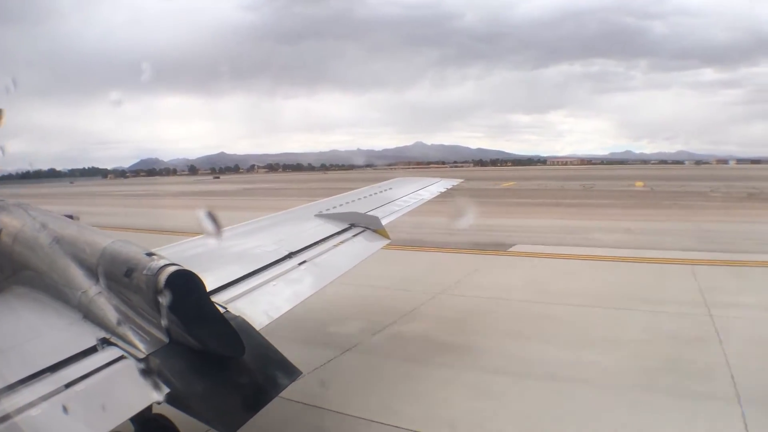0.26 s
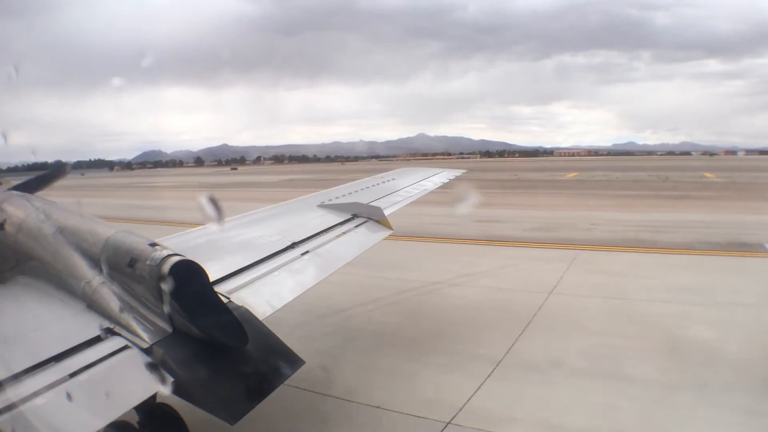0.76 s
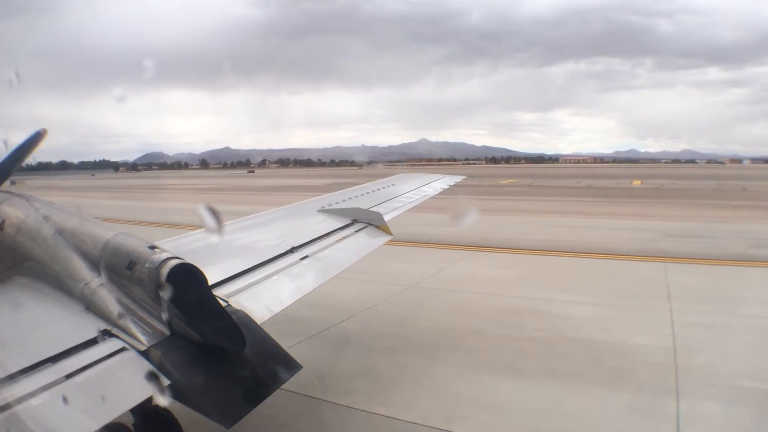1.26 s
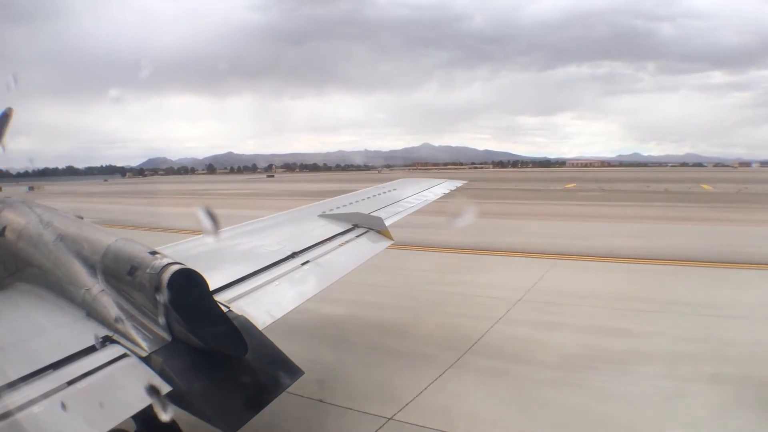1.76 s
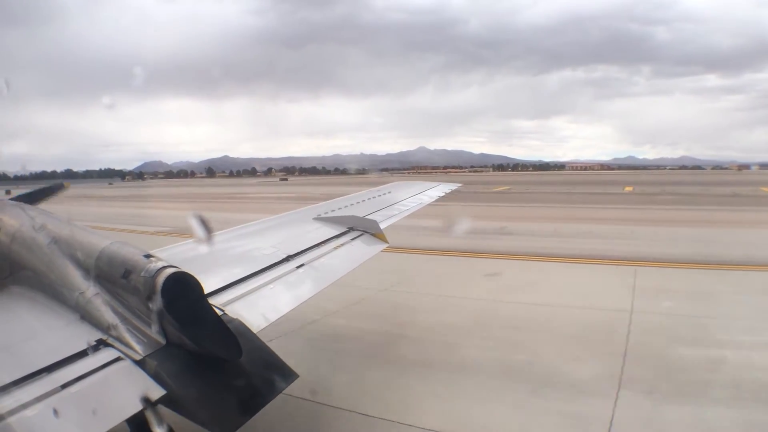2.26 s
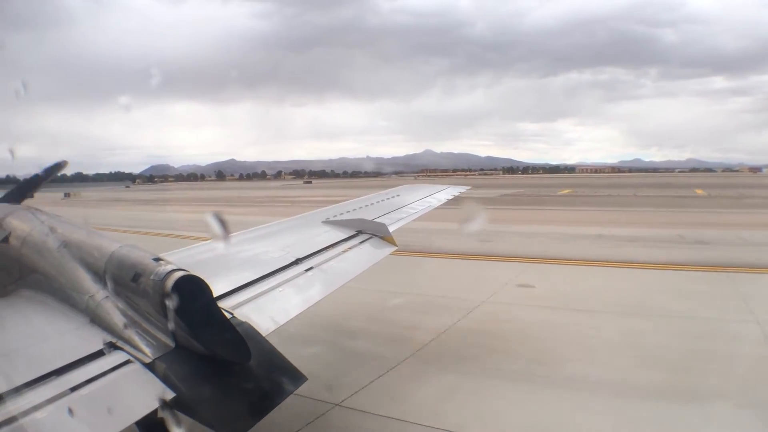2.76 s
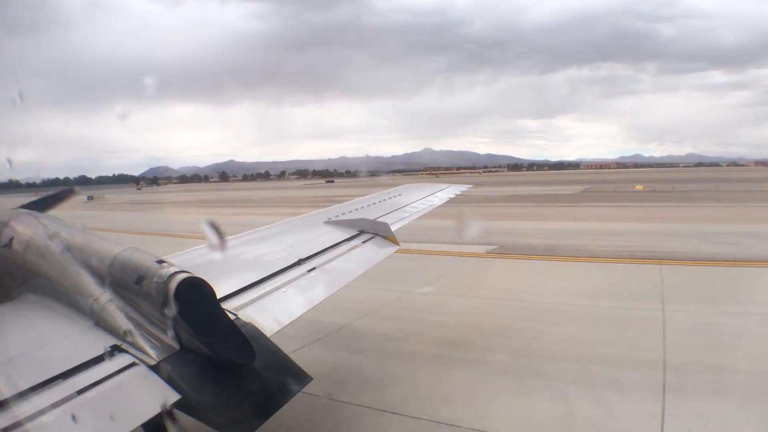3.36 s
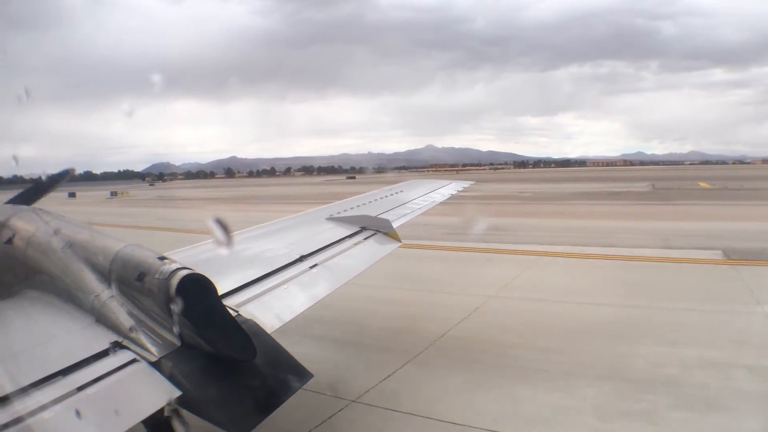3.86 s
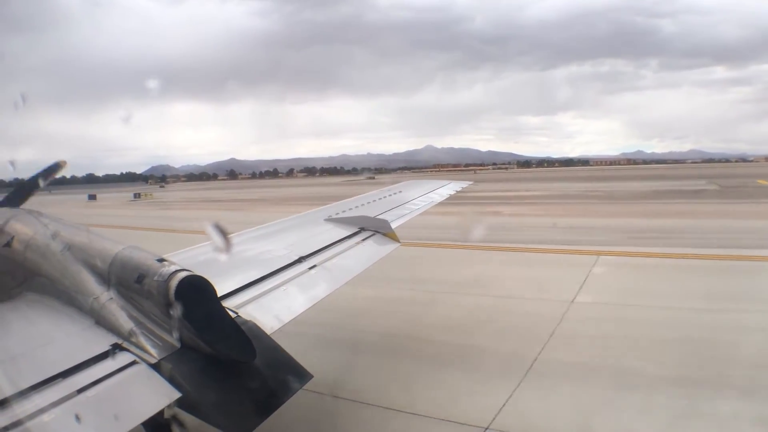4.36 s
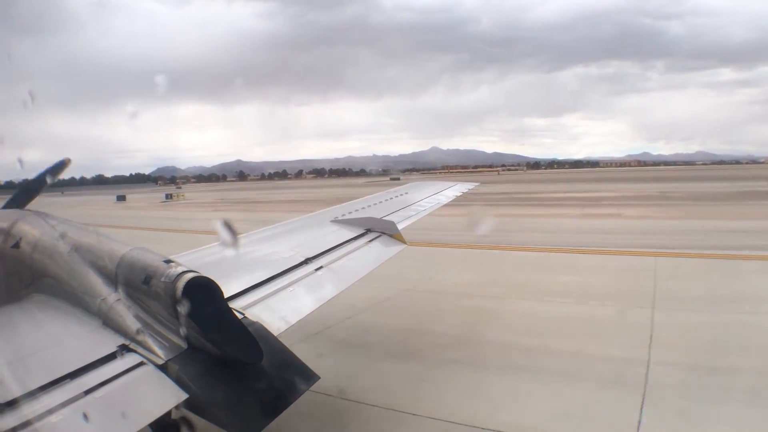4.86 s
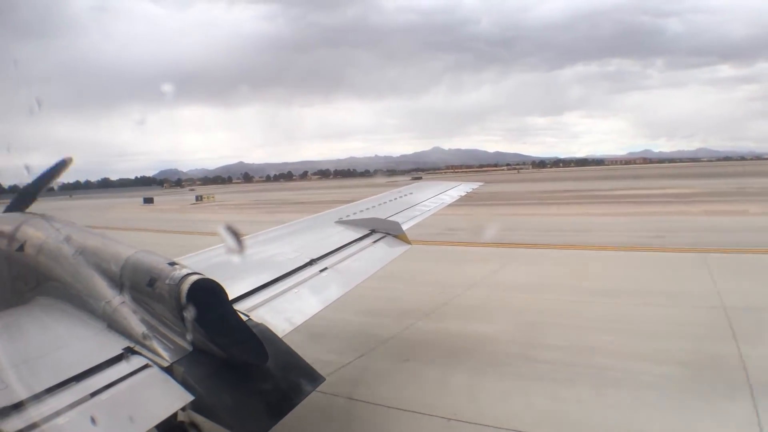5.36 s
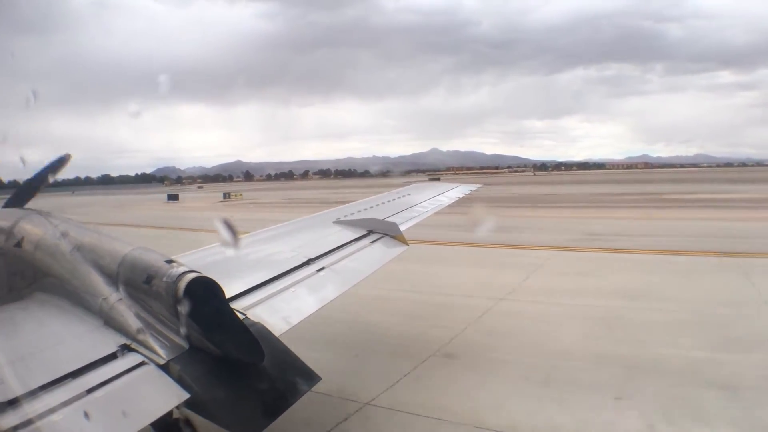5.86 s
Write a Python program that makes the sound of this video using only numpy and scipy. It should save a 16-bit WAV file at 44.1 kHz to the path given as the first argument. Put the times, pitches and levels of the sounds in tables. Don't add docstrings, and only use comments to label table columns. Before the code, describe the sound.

Inside a small propeller plane rolling over a slab runway, engines roar and whine steadily while wheels thump heavily and trim rattles and ticks.

```python
import sys
import numpy as np
from scipy import signal
from scipy.fft import rfft, irfft, next_fast_len
from scipy.io import wavfile

SR = 44100
rng = np.random.default_rng(int(sys.argv[2]) if len(sys.argv) > 2 else 0)


def output_pcm(signal):
    pcm = np.clip(np.atleast_2d(signal).T, -1, 1) * 32767
    wavfile.write(sys.argv[1], SR, np.round(pcm).astype(np.int16))


def convert_level_to_amplitude(level_db):
    exponent = np.asarray(level_db, float) / 20
    return 10 ** exponent


N = 269451

# (frequency [Hz], level [dB per Hz])
VENT_COLOUR = [(4000, -32), (6500, 1), (8400, -2), (8900, 2.5), (10500, 1), (13000, -1.5), (15300, -4),
               (17000, -14.5)]
# (frequency [Hz], level [dB per Hz])
ROAR_COLOUR = [(120, -45.5), (200, -3.5), (243, -9), (414, -12.5), (543, -15.5), (801, -20), (1050, -21),
               (1700, -24.5), (2100, -29), (3200, -31.5), (3800, -37), (5000, -41), (6300, -49),
               (8000, -61), (12000, -87.5)]
# (frequency [Hz], level [dB per Hz])
RUMBLE_COLOUR = [(10, -32), (22, -21.5), (36, -12.5), (47, -6.5), (70, -14), (90, -19), (108, -7.5),
                 (162, -1), (260, -21.5), (340, -48.5), (570, -120)]
# (frequency [Hz], width [Hz], lift [dB])
HULL_RESONANCES = [(67, 3.8, -2), (83, 4.9, -7), (134.9, 18, 7), (171, 21, 3), (317, 110, 6.5),
                   (707, 110, 3.5), (830, 39, -7), (917.5, 61, 7), (1074, 20, -2), (1343, 86, 3),
                   (1570, 16, 2), (1983, 41, 5.5), (2286, 50, 6), (2510, 52, 3.5), (3060, 340, 2.5),
                   (3567, 48, 2.5)]

# (time [s], level [dB])
ROAR_LEVEL = [(0, -31.5), (.87, -31), (1.6, -31.5), (2.64, -30.5), (3.2, -32), (4.4, -31.5), (5.05, -34),
              (5.46, -31.5), (6.11, -31.5)]
WHINE_HZ = [67, 83, 195.7, 448.2, 968.5, 1148, 1422.5, 1661.7, 1687.7, 1721.2, 2738.4, 3483]
# (rms level [dB], pitch wander [Hz], level wander [dB])
WHINE_LEVELS = [(-31.5, 1.94, 4), (-34, 1.95, 4), (-39, 0.4, 0.5), (-47, 1.6, 4), (-53, 1.48, 3),
                (-76.5, 0.62, 11), (-56.5, 0.51, 4), (-64, 0.35, 2), (-59, 0.33, 4.5), (-54.5, 0.55, 2),
                (-65, 1.5, 4), (-70, 3.4, 3)]
# (pitch creep [Hz/s], level creep [dB/s])
WHINE_CREEP = [(-0.0089, 1), (0, -1), (0, 0.5), (1.303, -0.9), (0.013, 0), (0.63, 0.5), (-0.118, 0),
               (-.15, -2.5), (-0.19, 0), (-.22, -0.55), (-0.13, -1), (-1, 2)]

# (time [s], peak level [dB])
TRIM_TICKS = [(0.1062, -54), (0.1782, -54.5), (0.2178, -55), (0.2652, -52), (0.3594, -50), (0.4811, -51.5),
              (0.5261, -49), (0.5891, -53), (0.636, -51), (0.7872, -52.5), (0.8584, -52), (0.8832, -48),
              (0.9154, -49), (1.0134, -50.5), (1.1096, -50), (1.1891, -49), (1.2573, -51), (1.3588, -53.5),
              (1.5541, -52.5), (1.9146, -51.5), (1.994, -52), (2.1651, -48), (2.3412, -52), (2.4125, -50.5),
              (2.5816, -54), (2.6293, -53), (2.7864, -53.5), (2.8569, -53.5), (3.0729, -49),
              (3.1445, -51.5), (3.3169, -45), (3.3306, -50), (3.3785, -52.5), (3.4735, -51.5),
              (3.5586, -54), (3.84, -52.5), (3.8898, -53), (3.9647, -50.5), (4.0073, -50.5),
              (4.0364, -53.5), (4.1118, -52.5), (4.1738, -54), (4.2056, -53.5), (4.5541, -52), (4.842, -52),
              (4.9339, -55), (5.0974, -52), (5.1437, -54.5), (5.3337, -54.5), (5.4534, -51), (5.481, -53),
              (5.5574, -50), (5.7154, -53.5), (6.0226, -50.5), (6.0431, -52)]
# (time [s], puff peak level [dB], ping level [dB], ping frequency [Hz])
TRIM_RATTLES = [(.357, -55, -78, 14810), (.478, -50, -66, 12170), (.521, -45, -56, 5000),
                (.582, -55, -68, 14200), (0.637, -54, -71, 12290), (0.771, -54, -70, 9600),
                (.783, -58, -65, 12000), (.883, -49, -66, 14300), (.908, -49, -65, 7120),
                (1.012, -58, -65, 8480), (1.039, -63.5, -64, 12170), (1.107, -51.5, -68, 7420),
                (1.188, -53, -62, 7010), (1.284, -60, -71, 14030), (1.552, -57.5, -72, 9460),
                (1.698, -58.5, -72, 11500), (1.904, -54.5, -63, 14130), (1.995, -56.5, -72, 14500),
                (2.164, -52, -63, 14800), (2.336, -55.5, -65, 7750), (2.407, -47, -64, 7190),
                (2.577, -58.5, -72, 7000), (2.605, -60, -69, 14600), (2.625, -54.5, -68, 10200),
                (2.642, -61, -67, 11000), (2.72, -64.5, -66, 11620), (2.859, -59, -69, 11600),
                (2.872, -59, -68, 10110), (3.069, -46.5, -49, 3300), (3.141, -56, -66, 10110),
                (3.312, -46.5, -58, 9420), (3.316, -54, -52, 4360), (3.316, -58, -66, 7600),
                (3.329, -55, -65, 7700), (3.322, -49, -68, 11480), (3.463, -57.5, -69, 11500),
                (3.836, -56.5, -66, 10340), (3.962, -55, -64, 11750), (4.005, -56, -74, 8430),
                (4.05, -49.5, -69, 8400), (5.097, -55, -67, 8600), (5.251, -53.5, -65, 9630),
                (5.328, -62.5, -72, 11800), (5.37, -57, -70, 11100), (5.478, -59, -73, 7200),
                (5.543, -55, -71, 10600), (5.566, -59, -73, 11300), (5.641, -54.5, -74, 9080),
                (5.715, -60, -72, 11400), (5.949, -62, -74, 11360), (6.039, -63, -72, 7530)]
NEIGHBOUR_HZ = [7200, 8400, 9600, 10100, 11600, 4900]
# (time [s], peak level [dB], frequency [Hz], time to fall 60 dB [s])
PANEL_KNOCKS = [
    (.754, -23, 744, .05),
    (.84, -26, 1290, .05),
    (1.146, -32, 2300, .05),
    (2.965, -25, 1850, .06),
    (2.969, -28, 1010, .05),
    (2.972, -22, 684, 0.059),
    (3.851, -23, 566, .02),
    (5.9452, -14, 750, 0.14),
    (6.0218, -17.5, 749, 0.065),
    (6.0745, -10, 718, 0.091),
]
# (time [s], peak level [dB], time to fall 60 dB [s])
PANEL_CREAKS = [(.212, -33, .06), (.274, -32, .06), (.385, -32, .07), (.646, -34, .07), (.748, -27, .07),
                (.811, -30, .06), (.836, -32, .06), (.858, -32, .06), (.889, -31, .06), (.918, -32, .06),
                (1.01, -33, .06), (1.145, -32, .05), (1.165, -32, .06), (1.39, -32, .07), (1.61, -32, .06),
                (1.71, -33, .07), (1.98, -32, .06), (2.438, -33, .07), (2.576, -32, .06), (2.645, -31, .06),
                (2.845, -32, .06), (2.96, -24.5, .085), (3.083, -33, .09), (3.327, -34, .08),
                (3.358, -31, .06), (3.622, -33, .06), (4.036, -31, .06), (4.238, -31, .06)]
CREAK_BAND_HZ = [600, 3200]

# (time [s], rms level [dB])
BLADE_LOAD = [(0, -59), (2.3, -37.5), (3.4, -27.5), (4, -31), (4.5, -27.5), (5.3, -29), (5.8, -28.5),
              (6.11, -27.5)]
OVERTONE_DB = [-1, -4, -11.5]
# (frequency [Hz], width [Hz], lift [dB])
WALL_PANELS = [(83.2, 2.74, 13), (77, 2.8, 5), (78.7, 4.7, 5), (86.0, 1.3, 7.5), (125.4, 13, 8.5),
               (136, 11, 4.5)]
# (time [s], gain [dB])
CRACK_SWELLS = [(4.31, -6), (4.36, 3), (4.451, 0), (4.496, 3.5), (4.56, -8), (4.619, 3.5), (4.68, 6.5),
                (4.738, 4), (4.79, -1), (4.846, 5.5), (5.005, 4), (5.051, 1), (5.108, 9.5), (5.174, 6),
                (5.21, -8), (5.245, 8), (5.289, -16), (5.393, 8), (5.572, 0.5), (5.663, 2.5), (5.7, -5),
                (5.753, 3.5), (5.82, -7), (5.863, -1), (5.916, 5), (5.965, -10), (6.022, 7), (6.06, 1)]

# (time [s], rumble level [dB])
ROLLING_LOAD = [(0, -28.5), (.87, -30), (1.2, -27.5), (1.6, -29.5), (2.15, -25.5), (2.75, -28.5),
                (2.97, -25.5), (3.2, -30.5), (3.75, -24.5), (4.17, -33.5), (4.5, -27.5), (5.2, -29.5),
                (5.6, -25.5), (5.91, -31.5), (6.11, -25.5)]
# (time [s], peak level [dB], half length [s], bounce frequency [Hz])
SLAB_JOINTS = [(0.236, -6, 0.0035, 74.4), (0.327, -6, 0.011, 74.6), (0.465, -8.5, 0.0071, 87),
               (0.52, -5, 0.0079, 82), (0.874, -12, 0.019, 70), (.958, -6, 0.0096, 82),
               (1.052, -9, 0.0067, 75), (1.296, -6, 0.0094, 83), (1.665, -6.5, 0.01, 77),
               (1.794, -6.5, 0.0099, 87), (1.837, -9.5, 0.0076, 84), (2.004, -8.5, 0.0069, 83),
               (2.485, -12.5, 0.014, 69.4), (2.642, -11, 0.013, 83), (2.809, -7.5, 0.01, 73),
               (3.009, -4.5, 0.011, 88.5), (3.336, -6.5, 0.013, 81), (3.424, -7.5, 0.0065, 81),
               (3.556, 0, 0.0047, 82), (3.827, -6.5, 0.011, 76.5), (3.97, -7.5, 0.0079, 83),
               (4.151, -9.5, 0.013, 86), (4.249, -2, 0.0057, 86), (4.925, -2, 0.01, 82),
               (5.399, -8, 0.011, 84), (5.497, -1.5, 0.0028, 87), (6.088, -8, 0.006, 85)]
# (time [s], peak level [dB])
SLAB_CRACKS = [(.01, -6.5), (0.1, -14), (.165, -16), (0.592, -11.5), (.659, -15), (1.095, -9),
               (1.155, -9.5), (1.414, -8), (1.757, -9.5), (1.9, -14), (2.151, -17), (2.252, -8),
               (2.414, -15), (2.72, -10), (2.862, -12.5), (2.975, -13), (3.072, -17), (3.157, -10),
               (3.235, -15), (3.294, -9.5), (3.382, -14), (3.692, -13), (3.906, -9.5), (4.039, -19),
               (4.082, -11)]


def rms_one(x):
    return x / np.sqrt(np.mean(x ** 2) + 1e-20)


def in_time(rows):
    s, value = np.transpose(rows)
    return np.interp(np.arange(N) / SR, s, value)


def drift(rate):
    r = np.exp(-80 * np.pi * rate / SR)
    noise = rng.standard_normal(N // 40 + 2002)
    slow = signal.lfilter([1], [1, -2 * r, r * r], noise)[2000:]
    return np.interp(np.arange(N) / 40, np.arange(len(slow)), rms_one(slow - slow.mean()))


def through_hull(colour):
    size = next_fast_len(N)
    hz = np.maximum(np.arange(size // 2 + 1) * SR / size, 1)
    points = np.array(colour)
    level_db = np.interp(np.log(hz), np.log(points[:, 0]), points[:, 1])
    level_db += sum(db / (1 + (2 * (hz - f) / width) ** 2) for f, width, db in HULL_RESONANCES)
    white = rfft(rng.standard_normal(size))
    return rms_one(irfft(white * convert_level_to_amplitude(level_db), size)[:N])


def add(out, s, piece):
    i = round(s * SR)
    piece, i = piece[max(-i, 0):], max(i, 0)
    out[i:i + len(piece)] += piece[:N - i]


def bloom(t, length):
    x = 3 * t / (1.9 * length)
    return (x * np.exp(1 - x)) ** 3


def vent(ride_db):
    return convert_level_to_amplitude(-68 + ride_db + 0.6 * drift(14)) * through_hull(VENT_COLOUR)


def engines(roar_db):
    out = convert_level_to_amplitude(roar_db + 0.5 * drift(4.1) + 0.79 * drift(30)) * through_hull(ROAR_COLOUR)
    ride = convert_level_to_amplitude(roar_db - roar_db.mean())
    since = (np.arange(N) - N / 2) / SR
    starts = rng.random(len(WHINE_HZ))
    for hz, levels, creep, start in zip(WHINE_HZ, WHINE_LEVELS, WHINE_CREEP, starts):
        db, wander_hz, wander_db = levels
        hz_per_s, db_per_s = creep
        pitch = hz + hz_per_s * since + wander_hz * drift(2.45)
        turns = start + np.cumsum(pitch) / SR
        level = convert_level_to_amplitude(db + db_per_s * since + wander_db * drift(10.6))
        out += np.sqrt(2) * ride * level * np.sin(2 * np.pi * turns)
    return out


def crackle(ride_db, per_s, level_db):
    born = rng.random(N) < per_s * convert_level_to_amplitude(2.5 * drift(3)) / SR
    sizes = born * convert_level_to_amplitude(4 * np.minimum(rng.exponential(1, N), 2.2))
    fall = np.exp(-1 / (0.0055 * SR))
    bursts = signal.lfilter([1], [1, -fall], sizes) * rng.standard_normal(N)
    bright = signal.butter(1, [4000, 11000], "band", fs=SR, output="sos")
    return convert_level_to_amplitude(ride_db + level_db) * signal.sosfilt(bright, bursts)


def ticks():
    lead_s, rise_s, t60_s = 0.002, 0.002, 0.07
    out, t = np.zeros(N), np.arange(3000) / SR
    wide = signal.butter(1, [2500, 8500], "band", fs=SR, output="sos")
    whites = rng.standard_normal((len(TRIM_TICKS), len(t)))
    for (s, db), white in zip(TRIM_TICKS, whites):
        shape = convert_level_to_amplitude(db - 2.5 - 60 * t / t60_s) * (1 - np.exp(-t / rise_s))
        add(out, s - lead_s, shape * signal.sosfilt(wide, white))
    return out


def rattles():
    puff_s, ping_s, lead_s, neighbour_late_s = 0.023, 0.022, 0.0026, 0.014
    rough = 0.8
    out, t = np.zeros(N), np.arange(3000) / SR
    bright = signal.butter(2, [2800, 9000], "band", fs=SR, output="sos")
    shake = signal.butter(2, 160, fs=SR, output="sos")
    puffs = signal.sosfilt(bright, rng.standard_normal((len(TRIM_RATTLES), len(t))))
    luck = rng.random((len(TRIM_RATTLES), 2))
    ping_shape = bloom(t, ping_s)
    for (s, db, ping_db, hz), puff, (which, late) in zip(TRIM_RATTLES, puffs, luck):
        s = s - lead_s
        add(out, s, convert_level_to_amplitude(db - 6.5) * bloom(t, puff_s) * puff)
        shaking = rms_one(signal.sosfilt(shake, rng.standard_normal(len(t))))
        chatter = 1 - rough + rough * shaking
        add(out, s, convert_level_to_amplitude(ping_db + 4) * chatter * ping_shape * np.sin(2 * np.pi * hz * t))
        other_hz = NEIGHBOUR_HZ[int(which * len(NEIGHBOUR_HZ))]
        neighbour = convert_level_to_amplitude(db - 20) * ping_shape * np.sin(2 * np.pi * other_hz * t)
        add(out, s + neighbour_late_s * late, neighbour)
    return out


def knocks():
    rise_s, half_s = 0.0046, 0.0013
    out, t = np.zeros(N), np.arange(4000) / SR
    for s, db, hz, t60 in PANEL_KNOCKS:
        blow = np.exp(-0.5 * ((t - rise_s) / half_s) ** 2) * np.sin(2 * np.pi * hz * t)
        ring = 0.43 * (1 - np.exp(-(t / 0.02) ** 2)) * convert_level_to_amplitude(-60 * t / t60)
        after = ring * np.sin(2 * np.pi * 0.84 * hz * t)
        add(out, s - 0.002, convert_level_to_amplitude(db - 4.5) * (blow + after))
    return out


def creaks():
    out, t = np.zeros(N), np.arange(4000) / SR
    band = signal.butter(3, CREAK_BAND_HZ, "band", fs=SR, output="sos")
    whites = rng.standard_normal((len(PANEL_CREAKS), len(t)))
    for (s, db, t60), white in zip(PANEL_CREAKS, whites):
        dull = signal.lfilter([1], [1, -0.9], white)
        rub = rms_one(signal.sosfilt(band, dull))
        add(out, s, convert_level_to_amplitude(db - 1 - 60 * t / t60) * (1 - np.exp(-t / 0.007)) * rub)
    return out


def swells_and_jolts():
    swell_s, jolt_s, jolt_mute = 0.011, 0.0067, 0.79
    hits, swells = np.zeros((2, N))
    hits[[round(row[0] * SR) for row in SLAB_JOINTS]] = 1
    for s, db in CRACK_SWELLS:
        swells[round(s * SR)] = db
    t = np.arange(-3000, 3001) / SR
    swell_db = signal.fftconvolve(swells, np.exp(-0.5 * (t / swell_s) ** 2), "same")
    stilled = signal.fftconvolve(hits, np.exp(-0.5 * (t / jolt_s) ** 2), "same")
    return convert_level_to_amplitude(swell_db) * np.clip(1 - jolt_mute * stilled, 0, 1)


def propeller():
    start_hz, slowing_hz_per_s = 52.57, 2.31
    load_db = in_time(BLADE_LOAD)
    hz = start_hz - slowing_hz_per_s * np.arange(N) / SR
    turns = 0.2 + np.cumsum(hz + 0.2 * drift(2.6)) / SR
    out = np.zeros(N)
    for k, db in enumerate(OVERTONE_DB):
        tone_hz = (k + 1) * hz
        lift_db = sum(lift / (1 + (2 * (tone_hz - f) / width) ** 2) for f, width, lift in WALL_PANELS)
        wander_db = (-0.2 + 0.38 * k) * drift(4.3)
        level = convert_level_to_amplitude(load_db + db + lift_db + wander_db)
        out += np.sqrt(2) * level * np.cos(2 * np.pi * (k + 1) * turns)
    return out


def small_bumps():
    ripple_gap_s, jitter_s, half_s = 0.065, 0.0058, 0.0082
    ripple_db, ripple_spread_db = -18, 2.5
    strut_hz, strut_spread_hz = 82, 3.5
    marks = sorted(row[0] for table in (SLAB_JOINTS, SLAB_CRACKS, CRACK_SWELLS) for row in table)
    gaps = []
    for a, b in zip(marks, marks[1:]):
        parts = max(round((b - a) / ripple_gap_s), 1)
        gaps.append(np.linspace(a, b, parts + 1)[1:-1])
    s = np.concatenate(gaps)
    late, strength = rng.standard_normal((2, len(s)))
    ripples = np.column_stack([s + jitter_s * late, ripple_db + ripple_spread_db * strength])
    rows = np.vstack([SLAB_CRACKS, ripples])
    stretch, tuning = rng.standard_normal((2, len(rows)))
    return np.column_stack([rows, half_s * np.exp(0.22 * stretch), strut_hz + strut_spread_hz * tuning])


def wheels(rumble_db):
    out = convert_level_to_amplitude(rumble_db + 1.3 * drift(25)) * through_hull(RUMBLE_COLOUR)
    t = np.arange(-3000, 3000) / SR
    bumps = np.vstack([SLAB_JOINTS, small_bumps()])
    turns = rng.normal(0.28, 0.097, len(bumps))
    for (s, db, half, hz), turn in zip(bumps, turns):
        push = np.exp(-0.5 * (t / (0.83 * half)) ** 2) * np.cos(2 * np.pi * (hz * t + turn))
        add(out, s + t[0], convert_level_to_amplitude(db - 4) * push)
    return out


def scene():
    roar_db = in_time(ROAR_LEVEL)
    ride_db = 0.45 * (roar_db - roar_db.mean())
    background = vent(ride_db) + engines(roar_db)
    fittings = crackle(ride_db, per_s=55, level_db=-71.5) + ticks() + rattles() + knocks() + creaks()
    hum = swells_and_jolts() * propeller()
    return (background + fittings + hum + wheels(in_time(ROLLING_LOAD)))[None]


def top_cut(x):
    return signal.sosfilt(signal.butter(12, 15330, fs=SR, output="sos"), x)


def record(dry):
    limit = 0.75
    return top_cut(limit * np.tanh(dry / limit))


dry = scene()
out = record(dry)
output_pcm(out)
```